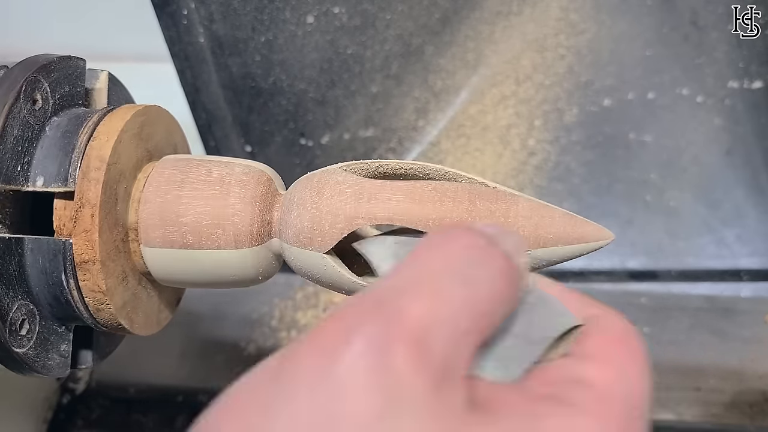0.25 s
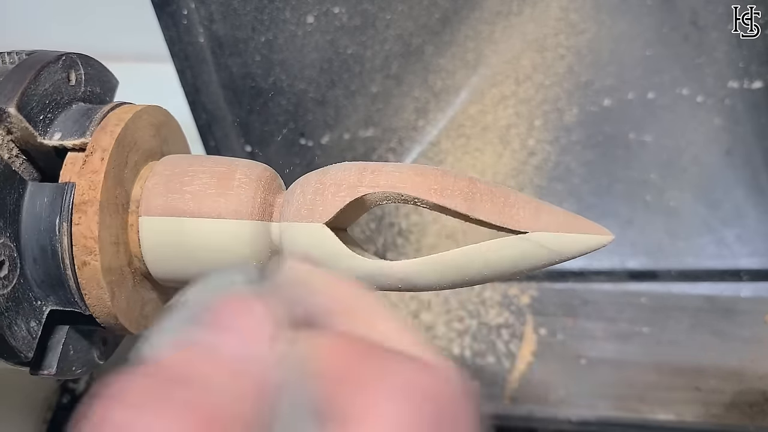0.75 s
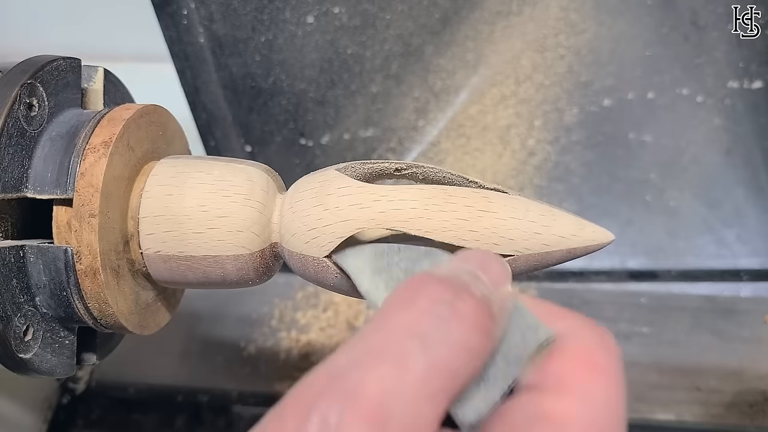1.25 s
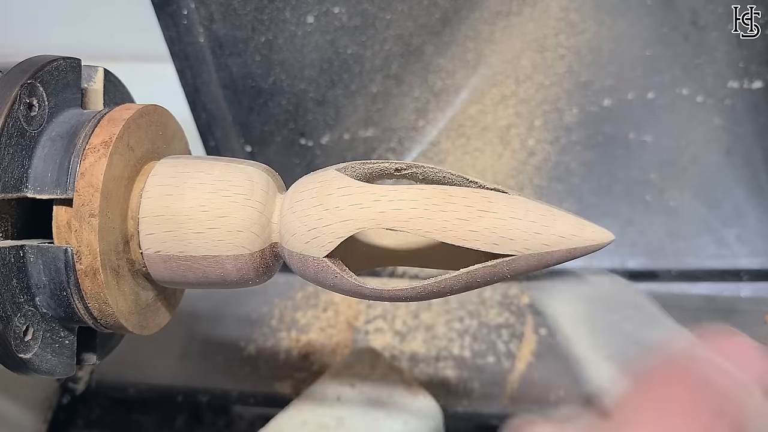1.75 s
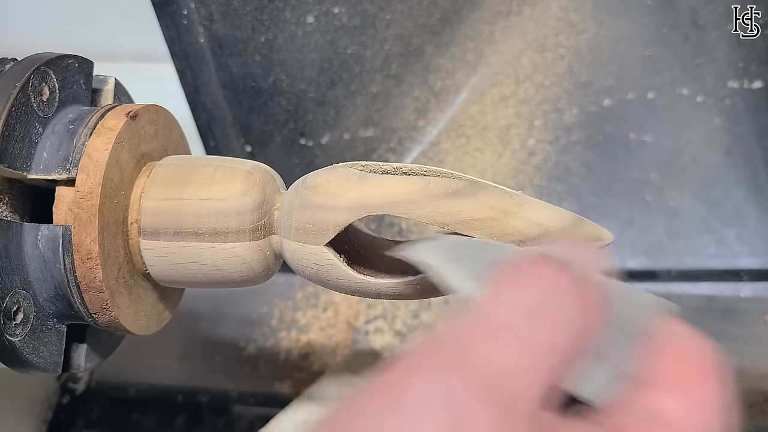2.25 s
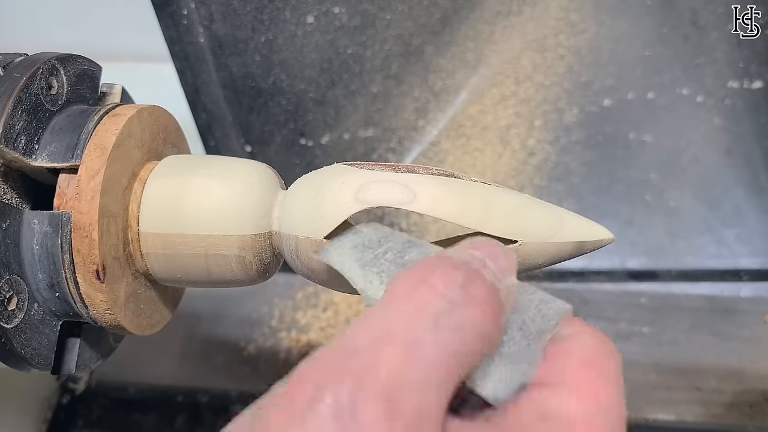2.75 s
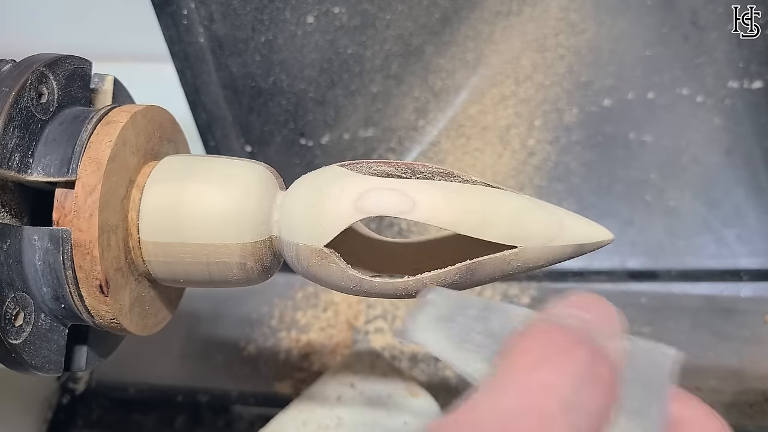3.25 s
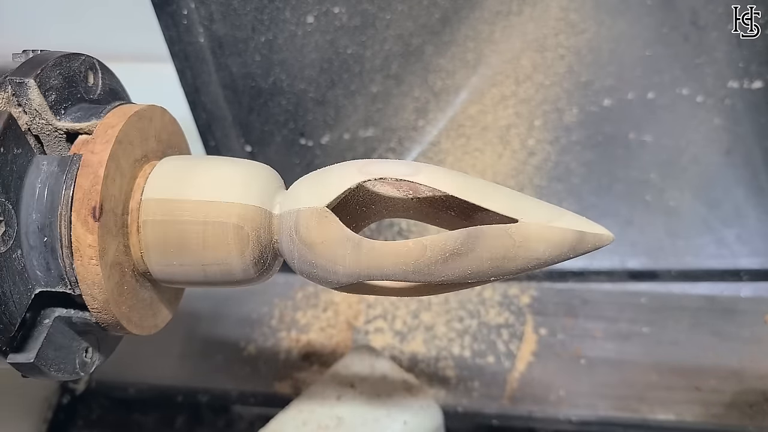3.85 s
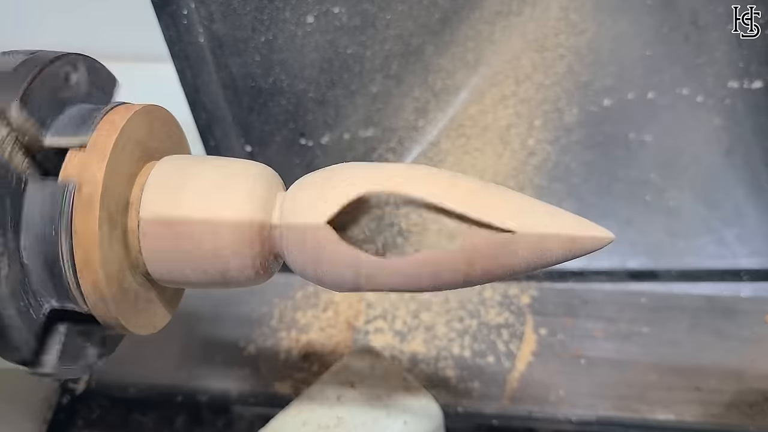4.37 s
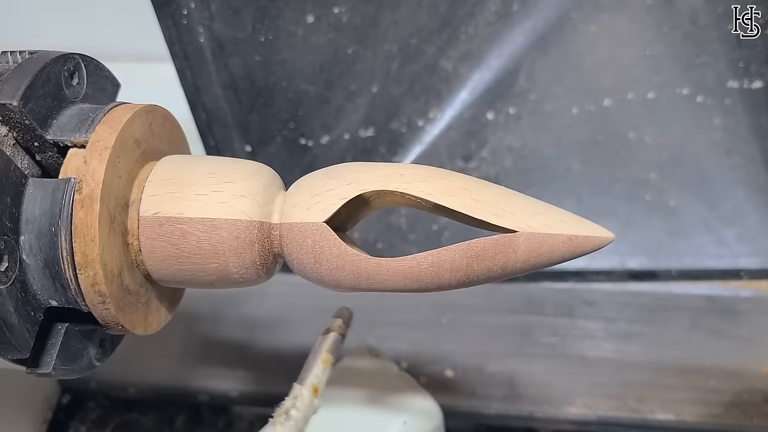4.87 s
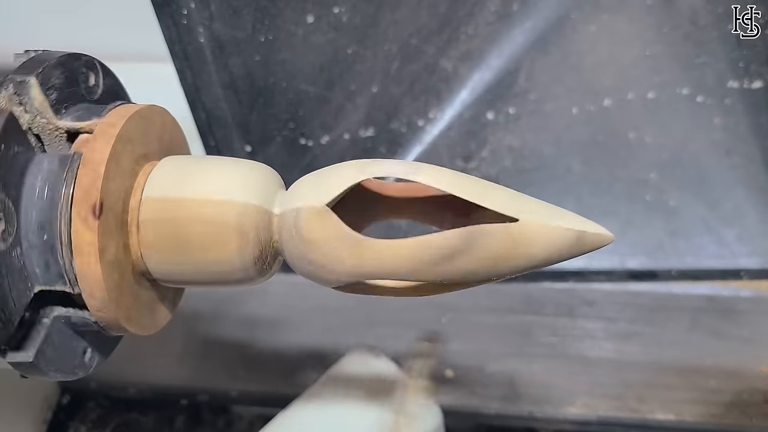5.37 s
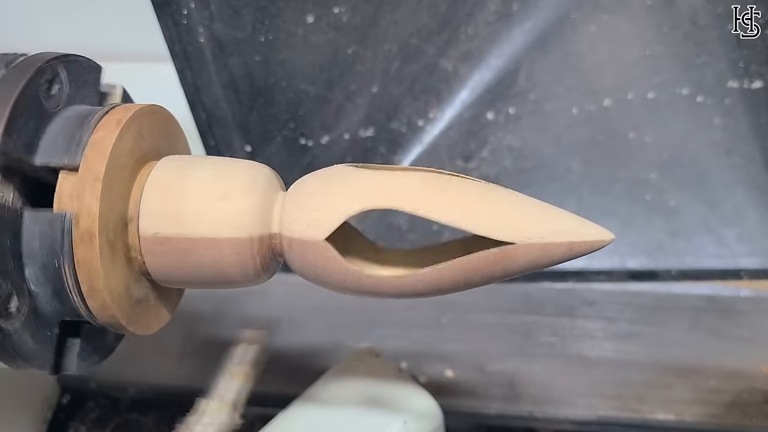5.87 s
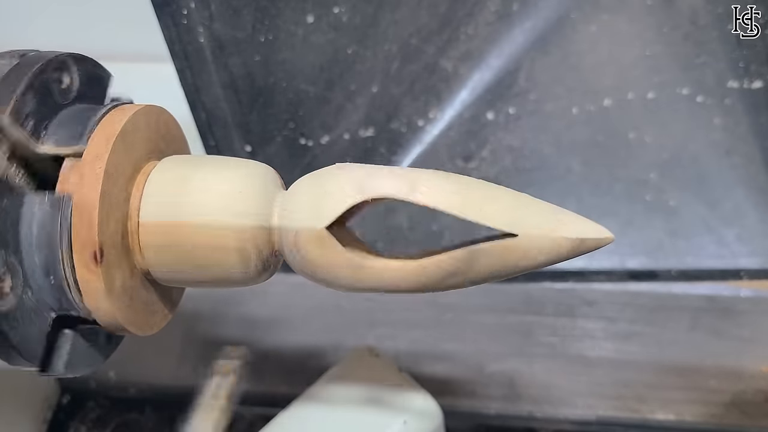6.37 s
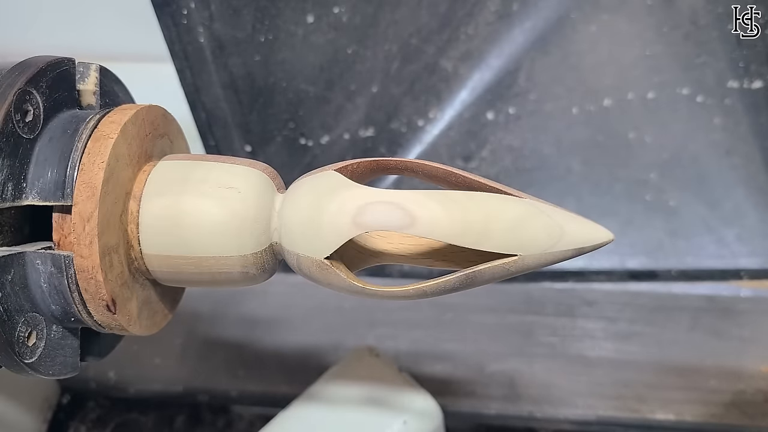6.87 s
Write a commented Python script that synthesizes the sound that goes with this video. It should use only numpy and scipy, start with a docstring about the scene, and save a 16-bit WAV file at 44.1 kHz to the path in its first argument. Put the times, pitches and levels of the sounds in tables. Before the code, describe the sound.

Dry, scratchy sandpaper strokes come in quick swishes with papery snaps and tiny hollow wood taps, close to a stereo microphone in a tight workshop space. A broad extractor roar and a low rumble lie beneath. The sanding thins out, then compressed air bursts in, first in brief puffs, then as a long uneven hiss with sharp flares and duller gusts. It stops and the roar remains.

```python
"""Folded sandpaper is flicked along the slots of a hollow wooden piece: gritty noise swells, short flicks
and ringing knocks. Then an air gun sweeps the slots: a gated noise jet with bright flares and duller puffs.
A dust extractor roars throughout (coloured noise, impeller tones), its body sinking while the gun blows;
a low rumble (narrow-band noise) lies under it. Two faint low thumps are heard, the second as the air gun
opens (single rounded pulses). Two ports hear bass alike, treble out of step."""
import sys
import numpy as np
from scipy import signal
from scipy.fft import rfft, irfft
from scipy.io import wavfile
from scipy.ndimage import uniform_filter1d

SR = 44100
rng = np.random.default_rng(int(sys.argv[2]) if len(sys.argv) > 2 else 0)


def unload_wav(signal):
    """Save mono or channel-first audio to the path in sys.argv[1] as 16-bit WAV at rate SR, clipped to [-1, 1]."""
    wavfile.write(
        sys.argv[1],
        SR,
        np.round(np.clip(np.atleast_2d(signal).T, -1, 1) * 32767).astype(np.int16),
    )


N = 313972

# edges of the separately flickering noise bands: f/Hz
BAND_EDGES_HZ = (3100, 4500, 6300, 7300, 8700, 10000, 12300, 14000)


def sandpaper(grit_db=2.0):
    """Grit catches the fibres in countless tiny slips of uneven size; the paper's edge flicks off ribs."""
    # colour, centre: f/Hz, relative density level/dB
    sand_centre = [(300, -50), (1410, -17), (2400, -10), (2680, -9), (3380, -16), (4250, -15.5),
                   (5140, -8.5), (6030, -15.5), (7890, -3.5), (8550, -3), (9480, 0), (11200, -2.5),
                   (13200, 2), (16000, -1)]
    # colour, side (plus left, minus right): f/Hz, relative density level/dB
    sand_side = [(1410, -53), (2400, -26), (2660, -11), (3000, -16), (4830, -11), (5390, -18), (6950, -6),
                 (7830, -12), (8550, 2.5), (13200, 2), (16000, 0)]
    # strokes along a slot: top t/s, swell/ms, high treble level/dB, low minus high treble/dB
    strokes = [(.004, 14, -64, -6), (.044, 23, -56, -10), (.098, 18, -68, -5), (.176, 29, -62, -11),
               (.222, 22, -65, -6), (0.339, 24, -52, -6.5), (.399, 14, -60, -6), (.666, 20, -64, -12),
               (.763, 20, -67, -8), (1.057, 20, -52, 0), (1.117, 18, -53, -5), (1.154, 22, -53.5, -3.5),
               (1.343, 16, -62, -6), (1.372, 29, -49.5, -9), (1.552, 14, -62, -5), (1.587, 27, -48.5, -7),
               (1.781, 22, -46.5, -8), (2.075, 15, -59, -4), (2.118, 18, -46.5, -8.5),
               (2.27, 14, -60.5, -3), (2.306, 27, -50, -7.5), (2.441, 14, -62.5, 6), (2.479, 19, -48, -7.5),
               (2.83, 44, -64.5, -3), (2.87, 21, -46.5, -9), (3.053, 30, -48, -10), (3.192, 16, -62, -6),
               (3.213, 26, -49.5, -8.5), (3.392, 28, -49.5, -12), (3.825, 30, -66, -3),
               (3.863, 37, -63, 1.5), (3.96, 20, -70, -4), (4.432, 26, -69, -3), (4.52, 17, -64, 0),
               (4.616, 40, -64.5, -1)]
    # edge catches or flicks off a rib: top t/s, high treble level/dB, low minus high treble/dB
    flicks = [(.2612, -68, 0), (.2883, -63, 2), (.403, -52, -2), (0.538, -69, 11), (1.042, -50, 2),
              (1.051, -49.5, 7.5), (1.072, -55, 0), (1.102, -60, -3), (1.1635, -47, -3), (1.195, -68, -4),
              (1.4196, -53.5, -1.5), (1.463, -56, -6), (1.5327, -49.5, -2), (1.5387, -49, -3),
              (1.597, -43, -5), (1.789, -39.5, -10), (2.067, -51, 0), (2.126, -44, -5.5),
              (2.3145, -42, -12), (2.424, -66, 6), (2.453, -63, -6), (2.485, -42, -10), (2.8, -63, -2),
              (2.8205, -65, 0), (3.006, -64, 0), (3.0126, -58, 2), (3.17, -67, -3), (3.1775, -62, 1),
              (3.219, -41, -15), (3.317, -53, -8), (3.401, -43, -17), (3.7225, -55, -4), (3.732, -53, -10),
              (3.7365, -60, -10), (3.781, -65, -8), (3.8085, -64, -6), (3.824, -62, -6), (4.6555, -56, 1),
              (7.03, -72, 8)]
    flick_ms, drag_db, drag_times = 3.3, -16.5, 2.1  # drag: fainter, longer swell around each stroke

    slip_db = grit_db * np.repeat(rng.exponential(size=N // 16 + 1), 16)[:N]
    slips = rng.standard_normal((2, N)) * undb(slip_db)
    rows = [(s, db, tilt_db) for s, ms, db, tilt_db in strokes]
    lengths_ms = np.array([ms for s, ms, db, tilt_db in strokes])

    level_db, tilt_db = swells(rows, lengths_ms, fall=0.78)
    drag_level_db, _ = swells(rows, drag_times * lengths_ms, fall=0.97)
    level_db = np.maximum(level_db, drag_level_db + drag_db)
    flick_level_db, flick_tilt_db = swells(flicks, [flick_ms] * len(flicks), fall=1.44)
    tilt_db = np.where(flick_level_db > level_db, flick_tilt_db, tilt_db)
    level_db = np.maximum(level_db, flick_level_db)

    bands = ports(slips, sand_centre, sand_side, BAND_EDGES_HZ)
    return play(bands, level_db + 1.2 * walk(250), tilt_db, round_ms=.6, patchy_db=1.6, rate_hz=50)


def piece(push_ms=6.6):
    """Each knock of the paper on a rib is a brief rough push that leaves the hollow wood ringing."""
    # modes of the hollow wood: f/Hz, t60/s
    wood_modes = [(2710, .05), (5280, .02)]
    # knocks: t/s, lower mode peak level/dB, upper minus lower mode/dB
    knocks = [(0.401, -55, -14), (0.538, -56, 2), (1.0544, -56, 8), (1.117, -53, -14), (1.1622, -48, -12),
              (1.3768, -54, -5), (1.419, -58, -5), (1.5369, -66, 8), (1.5854, -52, -8), (1.7754, -51, -3),
              (2.0659, -62, 5), (2.1141, -57, 2), (2.3044, -57, 3), (2.4748, -53, -1), (3.0096, -63, 8)]
    out, t = np.zeros(N + SR), np.arange(SR // 8) / SR
    decay = np.exp(-np.arange(400) / (push_ms * SR / 1000))
    for (s, db, upper_db), rough in zip(knocks, rng.standard_normal((len(knocks), 400))):
        push = rough * decay
        start = int(s * SR)
        for (hz, t60), mode_db in zip(wood_modes, (db, db + upper_db)):
            ring = signal.fftconvolve(push, np.sin(2 * np.pi * hz * t) * undb(-60 * t / t60))
            out[start:start + len(ring)] += undb(mode_db) * ring / np.abs(ring).max()
    return out[:N] * undb(np.array([[1.0], [-1.0]]))  # 1 dB up on the left, 1 dB down on the right


def air_gun(open_ms=4.5, shut_ms=11.3):
    """A plain jet gated by the trigger, giving way to a brighter ringing hiss as it crosses a slot."""
    # trigger pulls, opening to shutting: t/s, high treble level/dB, low minus high treble/dB
    pulls = [
        [(4.69, -50, -1), (4.698, -44.5, -8), (4.742, -43.5, -1.5)],
        [(4.782, -46.5, -8), (4.802, -44.5, -5), (4.821, -45, -8)],
        [(4.845, -49.5, -5), (4.901, -40.5, -3), (4.909, -46, 0), (5.023, -42.5, -5), (5.041, -48, 1.5)],
        [(5.068, -47, -6), (5.092, -43, -6), (5.19, -47.5, -8.5), (5.206, -40, -8), (5.244, -45, 0.5),
         (5.268, -32, -10), (5.296, -44, -3.5), (5.34, -36, -9), (5.384, -45, -9), (5.41, -37.5, -9.5),
         (5.432, -43, -5), (5.47, -39, -3), (5.476, -36.5, -9), (5.516, -42, -4.5), (5.536, -36, -4.5),
         (5.59, -44.5, -6.5), (5.606, -38, -9.5), (5.622, -43, -5.5), (5.73, -38.5, -4.5),
         (5.77, -41.5, -7)] + [(5.8, -42.5, -6), (5.83, -44, -7.5), (5.91, -38, -4.5), (5.928, -46, 0),
         (5.938, -38, -5), (5.972, -43, -3), (5.98, -38, -7), (5.996, -44, -3), (6.004, -39, -2.5),
         (6.09, -44, -6.5), (6.098, -39, -12), (6.114, -44.5, -4.5), (6.24, -37, -5), (6.266, -40.5, -8.5),
         (6.278, -44, 0.5), (6.32, -38, -9.5), (6.356, -43.5, -1), (6.366, -39, -0.5), (6.404, -40, -3.5),
         (6.424, -46, 3), (6.436, -38, -0.5), (6.446, -40, -3)],
    ]
    # jet colour, centre: f/Hz, relative density level/dB
    jet_centre = [(60, -50), (100, -29), (250, -10), (800, -16.5), (1900, -17.5), (2760, -13.5),
                  (3360, -11.5), (4470, -7.5), (5340, -3.5), (6980, -9.5), (7980, -2), (8900, -7.5),
                  (10600, -4), (12400, -8), (15200, -5.5), (16000, -11)]
    # jet colour, side (plus left, minus right): f/Hz, relative density level/dB
    jet_side = [(60, -60), (100, -26), (1120, -22), (1900, -41), (2400, -26), (2840, -23), (4850, -7.5),
                (8200, -5), (8800, 1.5), (10400, -5), (11200, 6.5), (12100, -1), (13200, -0.5), (15200, 0),
                (16000, -1)]
    # broad slot resonances and dips: f/Hz, width/Hz, level/dB
    slot_modes = [(3770, 260, 7), (5280, 700, 4), (7300, 560, -1), (7970, 440, 4.5), (9300, 400, -2),
                  (10600, 1900, 3.5), (15000, 1200, 3.5)]
    ring_from_db, ring_span_db = -46, 8  # ringing sets in at the first, rules once the span is passed

    t = np.arange(N) / SR
    s, db, colour_db = np.transpose(np.concatenate(pulls))
    gates_db = []
    for pull in pulls:
        before_ms = 1000 * np.maximum(pull[0][0] - t, 0)
        after_ms = 1000 * np.maximum(t - pull[-1][0], 0)
        gates_db.append(-10 * (before_ms / open_ms + after_ms / shut_ms))  # 10 dB per open_ms, shut_ms
    level_db = np.maximum(np.interp(t, s, db) + np.max(gates_db, axis=0), -120)
    tilt_db = np.interp(t, s, colour_db)
    ringing = np.clip((level_db - ring_from_db) / ring_span_db, 0, 1)

    grains = rng.standard_normal((2, 2, N)) * undb(1.0 * walk(600))
    jet_bands = ports(grains[0], jet_centre, jet_side, BAND_EDGES_HZ)
    jet = play(jet_bands, level_db + 0.87 * walk(60), tilt_db, round_ms=2., patchy_db=1.5, rate_hz=12)
    flare_bands = ports(grains[1], jet_centre, jet_side, BAND_EDGES_HZ, slot_modes)
    flare = play(flare_bands, level_db + 1.9 * walk(90), tilt_db, round_ms=4., patchy_db=1.9, rate_hz=30)
    return jet * np.sqrt(1 - ringing) + flare * np.sqrt(ringing) + inside_rush(level_db + tilt_db)


def inside_rush(jet_low_db):
    """Air rushing inside the hollow: a duller hiss that follows the jet, with puffs as it points straight in."""
    # puffs: top t/s, level/dB
    puff_rows = [(4.69, -55), (5.094, -52), (5.784, -50), (6.284, -47), (6.348, -41.5), (6.43, -44)]
    puff_ms, under_jet_db, edges_hz = 17, -10.5, (1670, 3340)
    band = signal.butter(2, edges_hz, "band", fs=SR, output="sos")
    mid, side = signal.sosfilt(band, rng.standard_normal((2, N)))
    hiss = unit(mid + .5 * side * np.array([[1], [-1]]))
    rows = [(s, db, 0) for s, db in puff_rows]
    puffs_db, _ = swells(rows, [puff_ms] * len(rows), fall=1.25)
    level_db = np.maximum(jet_low_db + under_jet_db, puffs_db)
    return hiss * undb(level_db + 2.6 * walk(40))


def room(x, t60=0.07, wet_db=-16):
    """A few close reflections off bed and dust shield, plus a short dense echo."""
    # reflections: delay/ms, level/dB
    reflections = [(1.13, -22), (2.7, -25), (4.9, -18.5)]
    t = np.arange(int(.3 * SR)) / SR
    tail = rng.standard_normal((2, len(t))) * undb(-60 * t / t60)
    tail *= undb(wet_db) / np.sqrt(np.sum(tail ** 2, axis=1, keepdims=True))
    near = sum(undb(db) * np.roll(x, int(ms * SR / 1000), axis=1) for ms, db in reflections)
    return x + near + signal.fftconvolve(x, tail, axes=1)[:, :N]


def extractor():
    """Turbulent roar in hose and housing, with slightly wavering impeller tones."""
    # airflow, centre: f/Hz, relative density level/dB
    airflow_centre = [(18, -74), (30, -48), (141, -13.5), (170, -6.5), (273, -5), (415, -5), (499, -9.5),
                      (569, -2.5), (822, -7), (937, 3), (1160, -1.5), (1460, -2.5), (2900, -28.5),
                      (14000, -48), (16000, -50)]
    # airflow, side (plus left, minus right): f/Hz, relative density level/dB
    airflow_side = [(18, -74.5), (30, -55), (145, -30.5), (174, -27), (499, -28.5), (666, -15), (800, -34),
                    (1000, -19), (1400, -20), (2410, -27.5), (3200, -29), (3600, -25), (4100, -32.5),
                    (6000, -37), (10000, -41.5), (16000, -50)]
    # hose resonances and dips: f/Hz, width/Hz, level/dB
    hose_modes = [(71.5, 46, -22), (271, 31, -6), (407, 50, 2), (518, 27, -3.5), (588, 150, 2.5),
                  (701, 43, 4.5), (835, 39, -7.5), (885, 157, 5), (3300, 463, 0.5), (2520, 86, 0.5),
                  (4760, 410, -5.5), (5740, 330, 2.5), (9264, 740, 5)]
    # shaft turn, third multiple, blade passing: multiple of shaft, level before the body gain/dB
    impeller_tones = [(1, -60.5), (3, -66.5), (8, -57)]
    # gain over time, body sinking while the air gun blows: t/s, body level/dB, treble level/dB
    roar_gain = [(0, -1.2, -1), (3.5, -1.1, -2), (4.0, -1.7, 0), (4.4, -1.2, -1.5), (4.68, -0.5, 0.5),
                 (4.73, -6.5, 0), (5.1, -8.5, 8), (6.5, -8, -11), (6.7, -5.5, -8), (7.12, -5, -4.5)]
    shaft_hz, reference_db = 176.5, -41  # reference: body RMS before gain and waver

    t = np.arange(N) / SR
    s, body_db, treble_db = np.transpose(roar_gain)
    body, treble = ports(rng.standard_normal((2, N)), airflow_centre, airflow_side, (2600,), hose_modes)
    scale = undb(reference_db) / np.std(body)
    phase = 2 * np.pi * np.cumsum(shaft_hz * (1 + 0.000303 * walk(2.05))) / SR
    tones = sum(np.sqrt(2) * undb(db + 0.72 * walk(5.33)) * np.sin(k * phase) for k, db in impeller_tones)
    body = scale * body * undb(0.53 * walk(2.74)) + tones
    body = body * undb(np.interp(t, s, body_db))
    return body + scale * treble * undb(np.interp(t, s, treble_db) + 0.29 * walk(8.8))


def rumble():
    """Wavering low rumble through the floor: noise in a narrow bass band."""
    # rumble: t/s, level before waver/dB
    rumble_level = [(0, -83), (2.8, -78.5), (3.6, -73.5), (4.6, -78), (5.7, -73.5), (7.12, -78.5)]
    centre_hz, width_hz = 95.7, 45
    t = np.arange(N) / SR
    edges_hz = [centre_hz - width_hz / 2, centre_hz + width_hz / 2]
    band = signal.butter(3, edges_hz, "band", fs=SR, output="sos")
    mid, side = signal.sosfilt(band, rng.standard_normal((2, N)))
    noise = unit(mid + 0.13 * side * np.array([[1], [-1]]))
    return noise * undb(np.interp(t, *np.transpose(rumble_level)) + 2.6 * walk(5))


def thumps(width_ms=1.3):
    """Two faint low thumps, the second as the air gun opens: single Gaussian pulses, alike in both ports."""
    # thumps: t/s, peak level/dB
    thump_rows = [(.288, -53), (4.688, -51)]
    t = np.arange(N) / SR
    return sum(undb(db) * np.exp(-.5 * ((t - s) * 1000 / width_ms) ** 2) for s, db in thump_rows)


def swells(rows, lengths_ms, fall):
    """Level and tilt in dB over time: rounded swells, the loudest ruling; fall = fall time / rise time."""
    drop_db = 22.5  # lost one swell length before the top
    t = np.arange(N) / SR
    level_db, tilt_db = np.full(N, -120.), np.zeros(N)
    for (s, db, colour_db), length_ms in zip(rows, lengths_ms):
        near = slice(max(int((s - .2) * SR), 0), int((s + .2) * SR))
        lengths = 1000 * (t[near] - s) / length_ms
        swell_db = db - drop_db * np.where(lengths < 0, -lengths, lengths / fall) ** 1.62
        tilt_db[near] = np.where(swell_db > level_db[near], colour_db, tilt_db[near])
        level_db[near] = np.maximum(swell_db, level_db[near])
    return level_db, tilt_db


def ports(excite, centre, side, edges_hz, modes=()):
    """Colour noise for two close ports, partly coherent and phase-shifted; return bands split at the edges."""
    # port difference: f/Hz, share following the centre, phase lead/rad
    port_difference = [(300, 0.38, 3.1), (2000, 0.83, 1.7), (3990, .4, 1.74), (6030, 0.35, 1.4),
                       (8000, 0.4, 1.1), (10900, 0.43, 1.74), (15000, 0.76, 1.2)]
    hz = np.fft.rfftfreq(N, 1 / SR) + 1e-3

    def read(table, column):
        rows = np.array(table)
        return np.interp(np.log(hz), np.log(rows[:, 0]), rows[:, column])

    ring_db = sum(db / (1 + (2 * (hz - f) / width) ** 2) for f, width, db in modes)
    one, other = rfft(excite[0]), rfft(excite[1])
    alike = np.clip(read(port_difference, 1), 0, 1)
    following = alike * np.exp(1j * read(port_difference, 2)) * one
    diff = undb(read(side, 1)) * (following + np.sqrt(1 - alike ** 2) * other)
    pair = undb(read(centre, 1) + ring_db) * one + diff * np.array([[1], [-1]])
    above = [1] + [1 / (1 + (f / hz) ** 16) for f in edges_hz] + [0]
    return [irfft(pair * (a - b), N) for a, b in zip(above, above[1:])]


def play(bands, level_db, tilt_db, round_ms, patchy_db, rate_hz):
    """Let each band flicker alone; set high treble to level, low treble to level + tilt, both smoothed."""
    bands = [band * undb(patchy_db * walk(rate_hz)) for band in bands]
    low, high = sum(bands[:4]), sum(bands[4:])
    size = max(int(round_ms * SR / 1000), 1)
    level_db, tilt_db = uniform_filter1d(level_db, size), uniform_filter1d(tilt_db, 2 * size)
    low = low / low.mean(axis=0).std() * undb(level_db + tilt_db)
    return low + high / high.mean(axis=0).std() * undb(level_db)


def walk(rate_hz):
    """Random levels held 1 / rate_hz s and slewed twice; spread near 1."""
    k = int(SR / rate_hz)
    steps = np.repeat(rng.standard_normal(N // k + 1), k)
    return 1.3 * uniform_filter1d(uniform_filter1d(steps, k), k)[:N]


def undb(db):
    """Amplitude factor from dB."""
    return 10 ** (np.asarray(db) / 20)


def unit(x):
    """Scale to an RMS of 1."""
    return x / np.sqrt(np.mean(x ** 2))


def scene():
    """The work at the lathe in its small space, plus machine, rumble and thumps."""
    return room(sandpaper() + piece() + air_gun()) + extractor() + rumble() + thumps()


def record(dry):
    """The recorder cuts the top with a steep elliptic low-pass."""
    top_hz = 15700
    return signal.sosfilt(signal.ellip(16, .2, 70, top_hz, fs=SR, output="sos"), dry)


dry = scene()
out = record(dry)
unload_wav(out)
```